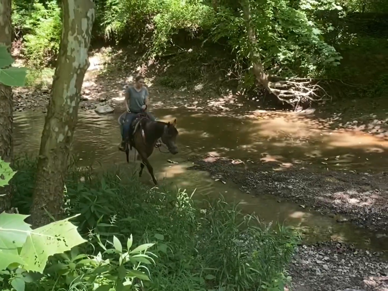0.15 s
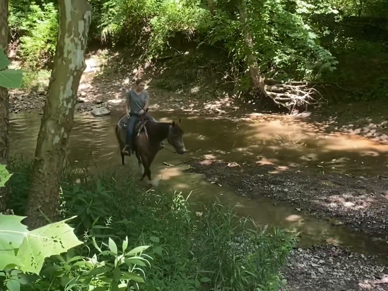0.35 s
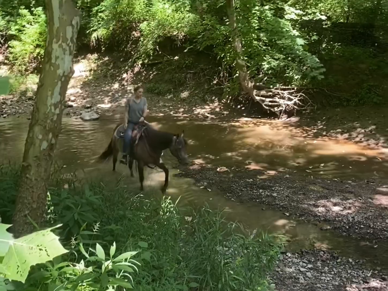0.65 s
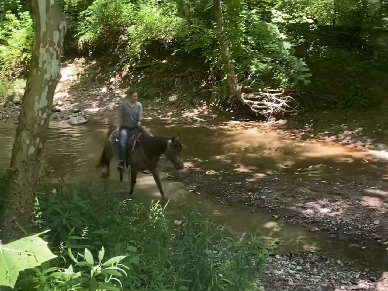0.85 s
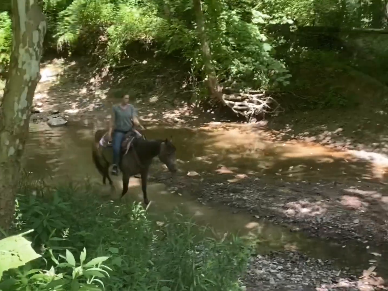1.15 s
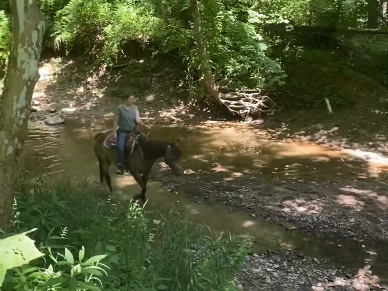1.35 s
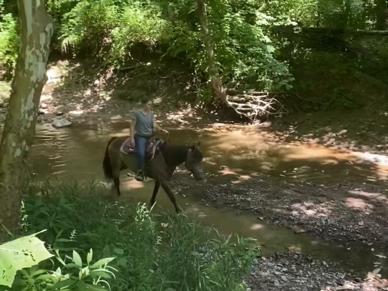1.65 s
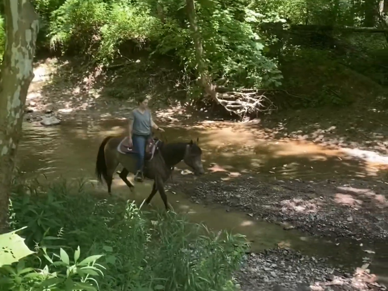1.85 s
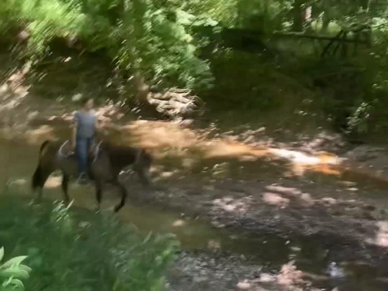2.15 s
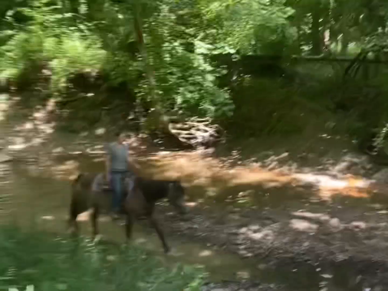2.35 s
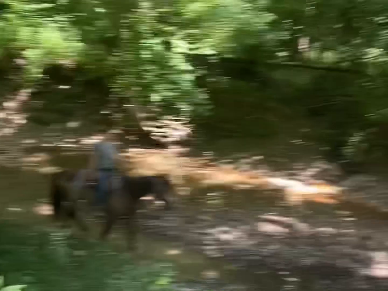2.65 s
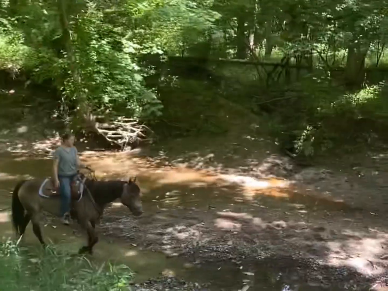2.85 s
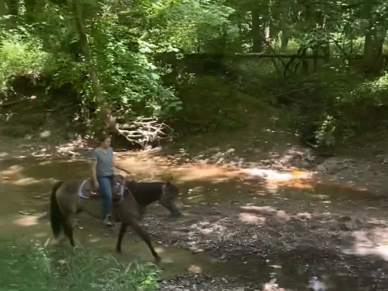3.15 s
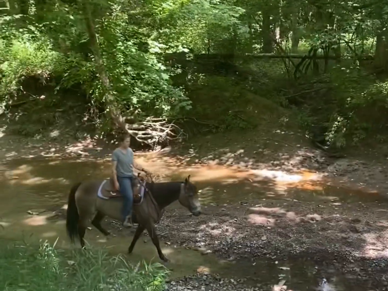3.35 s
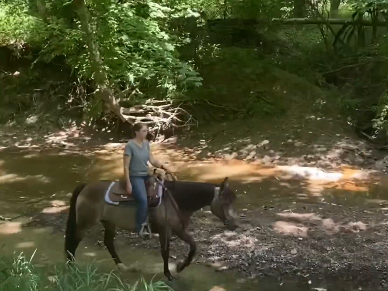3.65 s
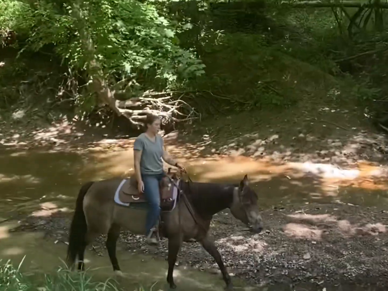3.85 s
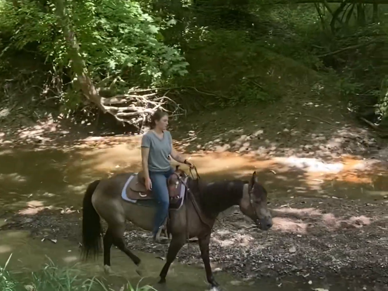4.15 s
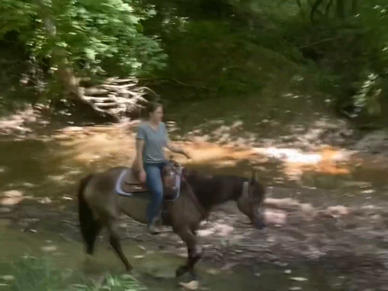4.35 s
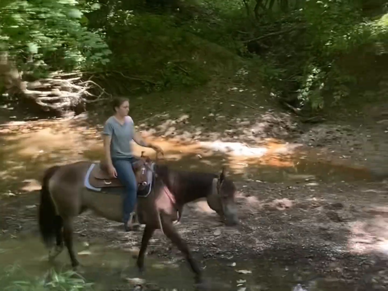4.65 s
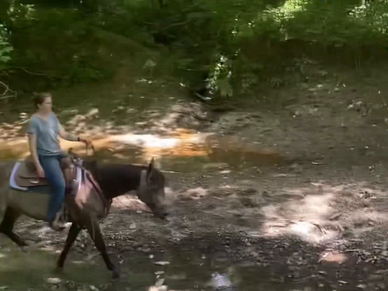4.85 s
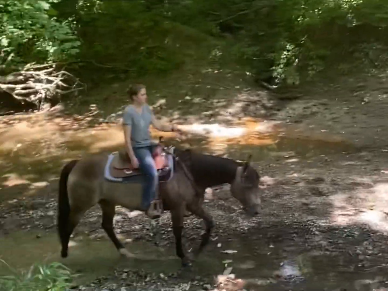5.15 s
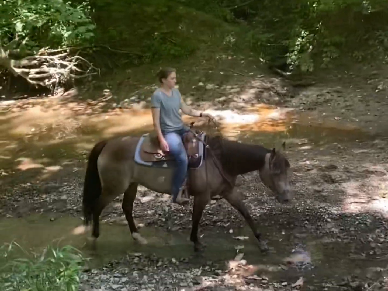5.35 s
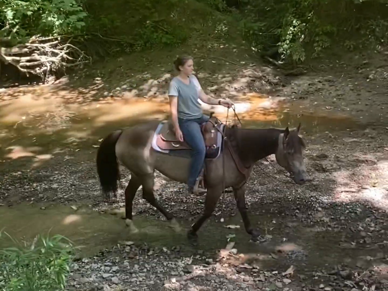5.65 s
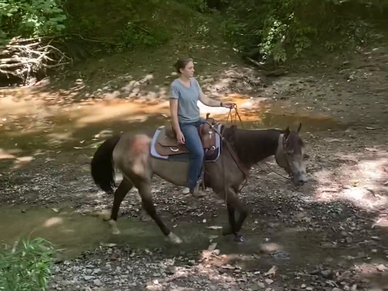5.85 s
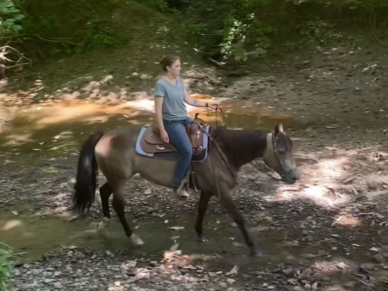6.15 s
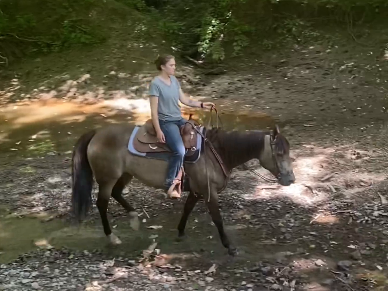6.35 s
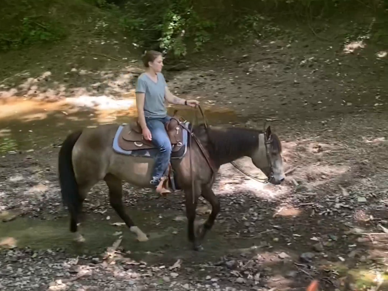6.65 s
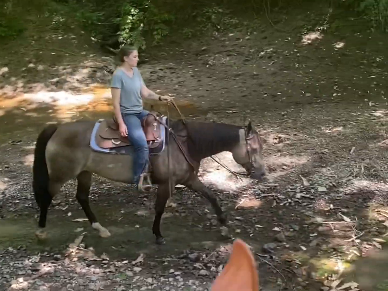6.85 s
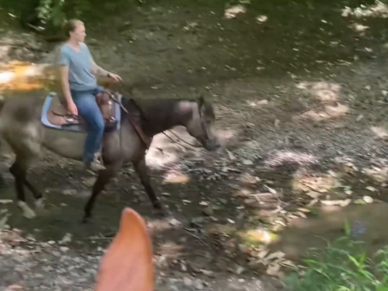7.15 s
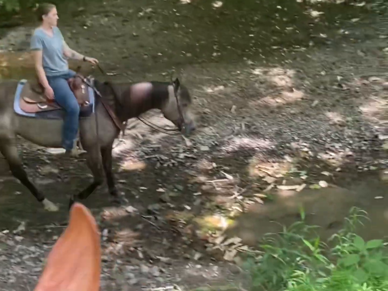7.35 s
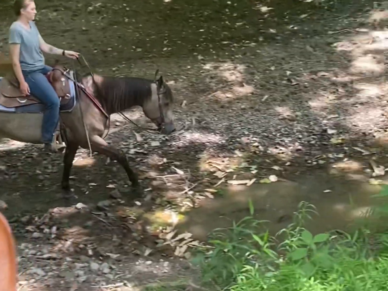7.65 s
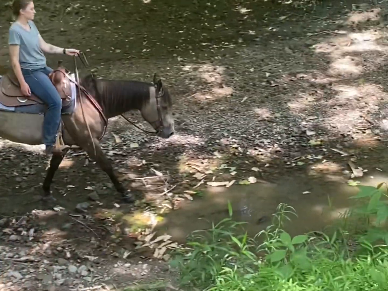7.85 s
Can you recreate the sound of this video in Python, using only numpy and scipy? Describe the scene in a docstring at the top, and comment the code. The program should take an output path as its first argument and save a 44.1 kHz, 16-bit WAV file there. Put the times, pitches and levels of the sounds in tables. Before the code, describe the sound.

A shallow creek trickles softly over a faint low rumble as a horse walks through it, heard in stereo slightly left. From 0 to 2 s, legs push slowly through the water with sloshes, bubbly churning, small plops and spray, plus muted pebble crunches and a few stone knocks. Between 2 and 3.5 s the wading is fuller, with hollow gulps, gliding gurgles and drops pattering back. Around 3.5 to 4 s the sound moves toward the middle and stones clack more often; the rumble swells gently near 4.6 s. At about 4.97 s a hard hoof fall gives a loud, high stone crack and a splashy slap. From 5.4 to 8 s, gritty gravel crunches and sharp knocks dominate, with a strong cluster near 5.8 s, while splashes and trickle thin out. The bank and trees answer faintly.

```python
"""A creek trickles softly over a low rumble, and at once a horse's legs start pushing through the water.
Plunging legs gulp, churn up bubbles and throw spray that rains back; hooves crunch gravel and knock stones. As
the horse moves from the shallow creek onto a wet gravel bar, the near bank and the trees answer faintly. Water
and gravel are showers of tiny damped rings over coloured noise; knocks are stone rings with a snap. Air pockets
and a few low thumps are tones whose pitch glides, and the echoes are noise that dies away."""
import sys
import numpy as np
from scipy import signal
from scipy.fft import rfft, irfft, next_fast_len
from scipy.io import wavfile
from scipy.ndimage import map_coordinates

SR = 44100
rng = np.random.default_rng(int(sys.argv[2]) if len(sys.argv) > 2 else 0)


def output_pcm(signal):
    """Save a mono or channel-first signal as 16-bit PCM at the path in sys.argv[1].

    Samples are clipped to [-1, 1] before scaling.
    """
    pcm = np.clip(np.atleast_2d(signal).T, -1, 1) * 32767
    wavfile.write(sys.argv[1], SR, np.round(pcm).astype(np.int16))


N = 352359

# Levels in the tables are those of the separate layers, before the final mix.
# Hooves pressing into the bed: start_s, length_s, pebbles_db, grit_db
HOOF_STEPS = [(0.109, 0.045, -53.5, -49.5), (0.233, 0.021, -45, -57), (0.391, 0.04, -50.5, -52),
              (0.808, 0.038, -49, -52), (1.208, 0.064, -52.5, -48.5), (1.625, 0.042, -50.5, -72),
              (1.958, 0.035, -40, -51.5), (2.339, 0.031, -48.5, -54.5), (2.388, 0.0058, -41, -52),
              (2.714, 0.023, -48.5, -49), (2.756, 0.023, -39.5, -50), (3.127, 0.06, -46, -50.5),
              (3.462, 0.044, -44, -50.5), (3.899, 0.032, -43.5, -47), (4.037, 0.034, -52.5, -59),
              (4.247, 0.0096, -46, -44.5), (4.269, .036, -39, -45), (4.425, .03, -51, -53),
              (4.651, .036, -40, -48), (5.409, .02, -45, -55), (5.569, 0.021, -41.5, -47.5),
              (5.764, 0.026, -42, -44.5), (5.822, 0.033, -47.5, -63), (5.862, 0.0077, -37.5, -46),
              (6.163, 0.023, -41, -41.5), (6.226, 0.0051, -39, -38.5), (6.604, 0.02, -52.5, -44.5),
              (6.975, 0.015, -42, -45.5), (7.366, 0.04, -49, -42.5), (7.7488, 0.01, -37, -55)]
# Stone knocking on stone: start_s, level_db, pitch_hz,
# crack_db and snap_db (relative to the ring, before a fixed boost of each)
STONE_KNOCKS = [(0.1228, -25.5, 1450, 7, -26), (0.2531, -30.5, 1530, -16, -22),
                (0.96, -31.5, 1285, 0.5, -27), (1.2633, -30, 1400, 1, -26), (1.824, -33, 2300, -3, -28),
                (1.939, -25.5, 2080, 2, -4), (2.391, -31, 1450, 1, -23), (2.714, -30, 1470, -26, -27),
                (3.1704, -25, 1520, -35, -35), (3.473, -26, 1610, -23, -2.5), (3.836, -33, 2160, -10, -18),
                (3.908, -30, 2630, -12, -3), (3.926, -33.5, 1110, -5, -22), (4.205, -36, 1450, -18, -16),
                (4.2689, -25.5, 1540, -2, -26), (4.308, -24, 2070, -22, 14), (4.6509, -26, 1150, -2.5, -21),
                (4.785, -29, 3870, -31, -12), (4.964, -9.5, 3760, -5, -15.5),
                (5.4115, -25.5, 1203, -37, -17.5), (5.5365, -33, 2860, -7, -13), (5.566, -32, 1035, -9, -8),
                (5.581, -31, 2830, -10, -16), (5.7795, -31, 1020, -6, -16), (5.767, -22, 1010, 4.5, -32),
                (5.802, -28.5, 1780, 1, -17), (5.851, -31, 1560, -2, -21), (5.8677, -18, 2810, -2, -26),
                (6.1678, -30, 1130, -2.5, -18), (6.2275, -24, 1490, -26, -16),
                (6.473, -37.5, 2950, -13, -11), (6.6119, -23, 1230, 5, 0), (6.988, -24, 1320, -8, -22),
                (7.3858, -24.5, 3100, -12, -20), (7.4029, -28, 1490, -17, -33), (7.7554, -22, 1390, 2, -21),
                (7.912, -39.5, 1580, 0, -3), (7.926, -35.5, 1640, 3, -10)]
# Ways one stone rings: pitch_multiple (varied at random for each knock), level_db
STONE_MODES = [(0.719, -18), (1.001, -3.5), (1.28, -9)]
# Air pockets closing behind a hoof or under a drip, and two low thumps near 2.4 s (the 72 Hz and 81 Hz rows):
# start_s, pitch_hz (at the peak), level_db, swell_s
PLOPS_AND_THUMPS = [(0.227, 460, -36, 0.0061), (.249, 660, -32.5, 0.0031), (.42, 513, -39.5, 0.0074),
                    (.85, 590, -44.5, 0.0063), (.917, 620, -49, 0.0088), (1.471, 605, -38.5, 0.0045),
                    (1.789, 664, -39.5, 0.0058), (1.972, 579, -37.5, 0.014), (2.146, 1260, -44.5, 0.0035),
                    (2.401, 72, -39, 0.0051), (2.429, 81, -35.5, 0.0056), (2.497, 1410, -42.5, .002),
                    (2.564, 702, -33.5, 0.009), (2.767, 784, -35, 0.0082), (2.805, 830, -35, 0.0053),
                    (2.854, 317, -35.5, 0.0066), (2.938, 305, -33, 0.0029), (3.168, 381, -38, 0.0048),
                    (3.496, 704, -38, 0.005), (3.508, 530, -29, 0.0036), (3.635, 597, -38.5, 0.0065),
                    (4.055, 785, -39.5, 0.0043), (4.297, 833, -34.5, 0.0046), (4.984, 640, -32.5, 0.0035),
                    (5.114, 1120, -38.5, .003), (5.742, 1290, -40, 0.0047), (6.173, 268, -40, 0.0062),
                    (6.194, 1890, -37, 0.0041), (6.633, 1720, -42.5, 0.0045), (6.745, 277, -43.5, 0.0082),
                    (7.574, 1510, -40.5, 0.0043)]
# Loudness of the low rumble: time_s, level_db
RUMBLE_LEVEL = [(0, -68), (3, -64.5), (4.6, -58), (5.9, -61.5), (6.6, -70), (8, -70.5)]

# Colours of the sounds, only relative within each table: frequency_hz, level_db (per Hz)
CHURN_COLOUR = [(60, -40), (150, 9), (420, -4.5), (750, 3.5), (1050, -2), (1600, -58), (4000, -82)]
DROP_COLOUR = [(500, -12), (950, -4.5), (1400, 0), (2600, -1.5), (3400, -10.5), (6000, -59)]
FIZZ_COLOUR = [(1500, -11.5), (2800, -2), (4000, -2), (5200, -4), (7200, -7), (10000, -10), (13000, -14),
               (16000, -43)]
PEBBLE_COLOUR = [(80, -36), (200, -1.5), (500, -6.5), (1100, 0.5), (2900, -4), (4500, -21), (9000, -50)]
RUMBLE_COLOUR = [(20, -39), (40, -5.5), (70, -1.5), (120, -3.5), (200, -7.5), (500, -41)]

# Stereo width of the textures: frequency_hz, side_to_mid_db
STEREO_WIDTH = [(60, -13), (180, -9), (550, -7), (2000, -13), (8000, -15)]
# Time the near bank's answer takes to fall by 60 dB: frequency_hz, decay_s
BANK_DECAY = [(200, 0.094), (1400, 0.052), (10000, 0.026)]
# Time the trees' answer takes to fall by 60 dB: frequency_hz, decay_s
TREE_DECAY = [(200, 1), (2000, 0.19), (10000, 0.069)]
# Phase by which the left channel leads for sound from ahead: frequency_hz, lead_radians
AHEAD_LEAD = [(0, 0), (5300, .4), (7100, 3.1), (8000, 3.3), (9800, 6.2), (11300, 6.5), (12800, 9.3)]
# Extra phase lead for sound from the left: frequency_hz, lead_radians
LEFT_LEAD = [(1800, 0), (2400, 1.4), (4500, 1.3), (5200, 0)]
# Left minus right level for sound from the left: frequency_hz, difference_db
LEFT_TILT = [(700, -1), (1300, 3), (2400, -2), (3700, 3), (4800, -1.5), (6000, 1)]
# Share of the sound that comes from the left: time_s, left_share (0 to 1)
LEFT_SHARE = [(3.5, 1), (3.9, 0.023)]
# Legs pushing through water: start_s, length_s, bubbles_db, bubble_pitch_hz (at the start), spray_db
LEG_PUSHES = [(0.072, 0.2, -57, 564, -52.5), (0.41, 0.039, -48.5, 560, -46),
              (0.545, 0.084, -56.5, 517, -52), (0.796, 0.11, -61.5, 676, -51),
              (1.225, 0.13, -53, 625, -44.5), (1.622, 0.075, -48.5, 596, -47),
              (1.752, 0.073, -50, 300, -54), (1.916, 0.091, -45, 590, -47), (2.32, 0.076, -53, 550, -51),
              (2.471, 0.096, -50.5, 335, -52), (2.748, 0.031, -34.5, 900, -43),
              (2.853, 0.08, -49, 500, -48.5), (3.135, 0.18, -51, 403, -54), (3.477, 0.041, -40, 556, -43.5),
              (3.585, 0.086, -47.5, 590, -49), (3.904, 0.19, -55.5, 640, -72),
              (4.246, 0.052, -43, 516, -43.5), (4.59, 0.06, -50, 448, -52), (4.948, 0.19, -52, 584, -51),
              (5.424, 0.28, -56, 640, -60), (5.76, 0.095, -59, 413, -70), (6.134, 0.22, -62.5, 400, -56.5),
              (6.57, 0.18, -73, 451, -59.5), (6.728, 0.04, -57, 314, -61.5), (7.347, 0.13, -63, 333, -54)]
# The running creek: time_s, drops_db (before a 3 dB cut), fizz_db
CREEK_TRICKLE = [(0, -53.5, -55.5), (2.4, -54.5, -57), (3.75, -53.5, -57.5), (5.18, -56.5, -60.5),
                 (6.25, -56, -60.5), (6.87, -62, -67), (7.99, -57, -65)]
# Stirred water between the steps: time_s, bubbles_db
LAPPING_LEVEL = [(0, -72), (2.3, -64), (4, -57.5), (5.4, -55.5), (6.6, -66), (8, -67.5)]
# Air pocket beside a leg growing or closing: start_s, length_s, start_pitch_hz, end_pitch_hz, level_db
LEG_GURGLES = [(1.245, 0.19, 616, 580.5, -49), (1.369, 0.086, 330, 150.4, -52),
               (1.82, .02, 1345, 2050, -45), (1.979, 0.17, 499.5, 150, -50.5),
               (2.139, 0.054, 230, 565, -52.5), (2.329, .06, 677, 567, -53), (2.5, .065, 173.4, 480, -48.5),
               (2.65, 0.042, 703, 735, -53), (2.778, 0.091, 401, 260, -46)]

TOP_HZ = 15800  # nothing passes above this
PUSH_S, SETTLE_S, DRAIN_S = 0.011, 0.049, 0.043  # rise of a push; decay of its bubbles; decay of its spray
SINK_OCT_PER_S = 1.6  # the bubbles get lower as the hoof goes deeper
LAPPING_HZ = 400  # pitch of the stirred water
FLIGHT_S, SCATTER_S = 0.27, 0.048  # thrown water lands this much later, spread over this time
# Landing drops, landing fizz and fizz of the throw, relative to the spray
FALL_DROPS_DB, FALL_FIZZ_DB, THROW_FIZZ_DB = -7, -9.5, -11
CAVITY_OCTAVES = .9  # width of the water pocket's resonance around a leg
STONE_CYCLES = 20  # wet gravel damps a stone within this many cycles
PLOP_RISE = .15  # share by which a plop ends above its pitch at the peak
SLAP_S, SLAP_BODY_DB, SLAP_FIZZ_DB, SLAP_DECAY_S = 4.9655, -35.5, -36.5, 0.052
# Random points a second for the pocket's flutter; share by which its pitch wavers
GURGLE_FLUTTER_HZ, GURGLE_WAVER = 140, .09
CLUMP_DB, CLUMP_HZ = 1.4, 45  # spray lands in small clumps: depth, and random points a second


def amp(db):
    """Turn decibels into a gain."""
    return 10 ** (np.asarray(db) / 20)


def unit(x):
    """Scale a sound to an average (rms) strength of 1."""
    return x / np.sqrt(np.mean(x ** 2) + 1e-20)


def along(points, hz):
    """Read a frequency table at any pitch, spacing pitches the way the ear does (log axis)."""
    table_hz, values = np.transpose(points)
    return np.interp(np.log(hz + 1), np.log(table_hz + 1), values)


def curves(rows):
    """Turn each column after the time into a curve with one value per sample."""
    times, *columns = np.transpose(rows)
    return [np.interp(np.arange(N) / SR, times, column) for column in columns]


def filtered(x, response):
    """Reshape a sound's frequencies with a given response."""
    n = x.shape[-1]
    padded = next_fast_len(n + 8192)
    spectrum = rfft(x, padded) * response(np.fft.rfftfreq(padded, 1 / SR))
    return irfft(spectrum, padded)[..., :n]


def add(track, start_s, sound):
    """Mix a sound into a track at a given time."""
    part = track[max(round(start_s * SR), 0):][:len(sound)]
    part += sound[:len(part)]


def wobble(rate):
    """A random curve: straight lines between random points, this many points a second."""
    points = rng.standard_normal(int(N * rate / SR) + 4)
    return map_coordinates(points, [np.arange(N) * rate / SR], order=1)


def ring(t, hz, cycles):
    """A vibration swells within a cycle or so, then falls by 60 dB in the given number of cycles."""
    shape = amp(-60 * t * hz / cycles) * (1 - np.exp(-t * hz)) ** 2
    return shape / shape.max() * np.sin(2 * np.pi * (hz * t + rng.random()))


def grains(lo_hz, hi_hz, cycles, rise, scatter_db, count, size):
    """A shower of tiny damped rings at random times, pitches, sizes and places, as mid and side signals."""
    start, place = rng.integers(0, N, count), rng.standard_normal(count)
    hz = lo_hz * (hi_hz / lo_hz) ** rng.random((count, 1))
    weight = amp(scatter_db * np.minimum(rng.exponential(size=(count, 1)), 4)) * hz
    turns = hz * np.arange(size) / SR
    age = np.minimum(turns / cycles, 1)
    shape = amp(-60 * age) * (1 - age) * (1 - np.exp(-2 * turns))
    rings = weight * shape * np.sin(2 * np.pi * turns * (1 + rise * age))
    index = (start[:, None] + np.arange(size)).ravel()
    mid_and_side = [np.bincount(index, (rings * gain).ravel(), N)[:N] for gain in (1, place[:, None])]
    return unit(np.array(mid_and_side))


def texture(shower, tone, blur_db):
    """Near grains over a noise blur of countless small ones, coloured and spread in stereo; rms 1."""
    # The blur gets half the colour here; the whole mix gets the full colour below.
    blur = unit(filtered(rng.standard_normal((2, N)), lambda hz: amp(along(tone, hz) / 2)))

    def colour_and_width(hz):
        return amp(along(tone, hz)) * np.array([np.ones_like(hz), amp(along(STEREO_WIDTH, hz))])

    mid, side = filtered(shower + amp(blur_db) * blur, colour_and_width)
    return unit(np.array([mid + side, mid - side]))


def swept(x, centre_hz, octaves):
    """Pass a sound through a broad resonance that follows a pitch curve; rms 1."""
    hz, t, z = signal.stft(x, SR, nperseg=1024)
    centre = np.interp(t, np.arange(N) / SR, centre_hz)
    gain = 1 / (1 + (np.log2((hz[:, None] + 1) / centre) / octaves) ** 2)
    # Moving the resonance should not change the loudness.
    gain /= np.sqrt(np.mean(abs(z) ** 2, axis=(0, 2)) @ gain ** 2)
    return unit(signal.istft(z * gain, SR, nperseg=1024)[1][:, :N])


def echo(x, decay_table, delay, size):
    """A diffuse stereo answer made of noise, in which each frequency dies at its own speed."""
    hz, t, z = signal.stft(rng.standard_normal((2, size)), SR, nperseg=256)
    decay = amp(-60 * t / along(decay_table, hz)[:, None])
    tail = signal.istft(z * decay, SR, nperseg=256)[1]
    tail = np.pad(tail / np.linalg.norm(tail[0]), ((0, 0), (round(abs(delay) * SR), 0)))
    return signal.fftconvolve(x, tail, axes=1)[:, :N]


def ports(x):
    """Two microphone ports hear the treble out of step, and unequally loud when it comes from the left."""
    def lead(points, hz):
        return np.exp(np.array([[.5j], [-.5j]]) * along(points, hz))

    def from_left(hz):
        return lead(LEFT_LEAD, hz) * amp(np.array([[.5], [-.5]]) * along(LEFT_TILT, hz))

    left_share = curves(LEFT_SHARE)[0].clip(0, 1)
    placed = (1 - left_share) * x + left_share * filtered(x, from_left)
    return filtered(placed, lambda hz: lead(AHEAD_LEAD, hz))


def rumble():
    """Moving air and handling make a soft low rumble, built from low noise."""
    return amp(curves(RUMBLE_LEVEL)[0]) * texture(np.zeros((2, N)), RUMBLE_COLOUR, blur_db=0)


def stroke(age, length, release):
    """A push through water builds up, holds and lets go; age counts from its start."""
    attack = 1 - np.exp(-np.maximum(age, 0) / PUSH_S)
    return attack * np.exp(-np.maximum(age - length, 0) / release)


def wading():
    """Each push churns, throws water and lets it fall back: bubble, drop and fizz levels, and bubble pitch."""
    t = np.arange(0, N, 64) / SR  # slow curves need only every 64th sample
    start, length, churn_db, hz, spray_db = np.transpose(LEG_PUSHES)[:, :, None]
    age = t - start
    # Squared levels (powers) add up where pushes overlap.
    churn = (amp(churn_db) * stroke(age, length, SETTLE_S)) ** 2
    throw = ((amp(spray_db) * stroke(age, length, DRAIN_S)) ** 2).sum(0)
    landing = np.exp(-.5 * ((age - FLIGHT_S) / SCATTER_S) ** 2)
    fall = (amp(spray_db) ** 2 * landing).sum(0)
    lapping = amp(np.interp(t, *np.transpose(LAPPING_LEVEL))) ** 2
    bubbles = churn.sum(0) + lapping
    # The louder a push is at this moment, the more it decides the pitch.
    sinking_hz = hz * 2 ** (-SINK_OCT_PER_S * age.clip(0, 1))
    pitch = ((churn * sinking_hz).sum(0) + lapping * LAPPING_HZ) / bubbles
    drops = throw + amp(FALL_DROPS_DB) ** 2 * fall
    fizz = amp(THROW_FIZZ_DB) ** 2 * throw + amp(FALL_FIZZ_DB) ** 2 * fall
    return curves(np.transpose([t, np.sqrt(bubbles), np.sqrt(drops), np.sqrt(fizz), pitch]))


def water():
    """The creek trickles; legs churn up big bubbles and thrown water rains back in drops and fine fizz."""
    churn, splash, hiss, bubble_hz = wading()
    creek_drops_db, creek_fizz_db = curves(CREEK_TRICKLE)
    drops_level = np.hypot(splash, amp(creek_drops_db))
    fizz_level = np.hypot(hiss, amp(creek_fizz_db))
    # A bubble's pitch climbs as it rises; a deep plunge traps bigger, lower ones.
    bubbles = grains(150, 1000, cycles=24, rise=.16, scatter_db=1.3, count=1800, size=2800)
    bubbles = swept(texture(bubbles, CHURN_COLOUR, blur_db=-8), bubble_hz, octaves=CAVITY_OCTAVES)
    drops = grains(1200, 3900, cycles=46, rise=.08, scatter_db=2, count=3600, size=700)
    drops = texture(drops, DROP_COLOUR, blur_db=-3)
    fizz = grains(2800, 13000, cycles=16, rise=.05, scatter_db=2.8, count=9000, size=160)
    fizz = texture(fizz, FIZZ_COLOUR, blur_db=4.5)
    spray = drops_level * amp(-3) * drops + fizz_level * fizz
    clumps = amp(CLUMP_DB * wobble(CLUMP_HZ))
    return churn * bubbles + clumps * spray


def plops_and_thumps():
    """Each pocket of air swells into a short ring whose pitch climbs as it nears the surface; the two lowest
    rows ring as dull low thumps."""
    out, t = np.zeros(N), np.arange(SR // 6) / SR
    for start, hz, db, swell in PLOPS_AND_THUMPS:
        age = t / swell  # 1 at the loudest moment
        glide = 1 + PLOP_RISE * np.tanh((age - 1) / 2)
        shape = (age * np.exp(1 - age)) ** 2
        add(out, start, amp(db) * shape * np.sin(2 * np.pi * hz * np.cumsum(glide) / SR))
    return out


def gurgles():
    """A pocket's radius changes steadily and its fluttering pitch goes inversely: down in a plunge, up in a lift."""
    out = np.zeros(N)
    for start, length, start_hz, end_hz, db in LEG_GURGLES:
        progress = np.arange(round(length * SR)) / (length * SR)
        size = len(progress)
        radius = (1 - progress) / start_hz + progress / end_hz  # in effect 1 / pitch
        pitch = (1 + GURGLE_WAVER * wobble(GURGLE_FLUTTER_HZ / 2)[:size]) / radius
        # Two random curves make both the strength and the phase flutter.
        flutter = (wobble(GURGLE_FLUTTER_HZ) + 1j * wobble(GURGLE_FLUTTER_HZ))[:size]
        tone = np.real(flutter * np.exp(2j * np.pi * np.cumsum(pitch) / SR))
        add(out, start, amp(db) * unit(tone * np.sqrt(np.sin(np.pi * progress))))
    return out


def slap():
    """The hardest hoof fall slaps up a sheet of spray, too fine for single drops, that dies smoothly."""
    age = np.arange(N) / SR - SLAP_S
    no_grains = np.zeros((2, N))
    body = amp(SLAP_BODY_DB) * texture(no_grains, PEBBLE_COLOUR, blur_db=0)
    fizz = amp(SLAP_FIZZ_DB) * texture(no_grains, FIZZ_COLOUR, blur_db=0)
    return (age > 0) * np.exp(-abs(age) / SLAP_DECAY_S) * (body + fizz)


def gravel():
    """Pebbles and grit grind while the hoof takes the weight; then the wet bed settles softly."""
    pebble_level, grit_level, t = np.zeros(N), np.zeros(N), np.arange(SR // 2) / SR
    for start, length, pebbles_db, grit_db in HOOF_STEPS:
        grind = np.exp(-np.maximum(t / length - 1, 0) / 0.36)
        settling = amp(-10.0) * np.exp(-t / (3.73 * length))
        push = (1 - np.exp(-t / 0.00012)) * np.maximum(grind, settling)
        add(pebble_level, start, amp(pebbles_db) * push)
        add(grit_level, start, amp(grit_db) * push)
    pebbles = grains(312, 4450, cycles=21.3, rise=0, scatter_db=2.3, count=3400, size=650)
    grit = grains(3330, 9200, cycles=17.0, rise=0, scatter_db=3.5, count=12000, size=130)
    pebbles = pebble_level * texture(pebbles, PEBBLE_COLOUR, blur_db=-8)
    return pebbles + grit_level * texture(grit, FIZZ_COLOUR, blur_db=-2)


def knocks():
    """Stones in wet gravel snap on contact, crack and ring a few cycles, scattered by the near bank."""
    out, t = np.zeros((2, N)), np.arange(SR // 12) / SR
    for start, db, hz, crack_db, snap_db in STONE_KNOCKS:
        body = np.zeros(len(t))
        for multiple, level_db in STONE_MODES:
            mode_hz = hz * multiple ** rng.normal(1, 0.36)  # no two stones have the same shape
            body += amp(level_db) * ring(t, mode_hz, cycles=STONE_CYCLES)
        crack = ring(t, hz=2590, cycles=3.8)
        snap = filtered(rng.standard_normal(len(t)), lambda f: amp(along(FIZZ_COLOUR, f) / 2))
        snap *= np.exp(-t / .0011)
        hit = body / abs(body).max()
        hit += amp(crack_db + 3.5) * crack + amp(snap_db + 9.0) * snap / abs(snap).max()
        hit *= amp(db) / abs(hit).max()
        answers = echo(hit[None], BANK_DECAY, delay=0.001823, size=4000)
        for channel, answer in zip(out, answers):
            add(channel, start, hit + amp(-5.0) * answer[:len(t)])
    return out


def scene():
    """The horse moves from the left towards the middle; the trees answer faintly."""
    horse_and_creek = knocks() + plops_and_thumps() + gurgles() + slap() + gravel() + water()
    horse_and_creek *= amp([[.25], [-.25]])  # slightly louder on the left
    woods = amp(-19) * echo(horse_and_creek, TREE_DECAY, delay=.018, size=30000)
    return ports(horse_and_creek + woods) + rumble()


def record(dry):
    """Keep nothing above the band limit."""
    return filtered(dry, lambda hz: hz < TOP_HZ)


dry = scene()
out = record(dry)
output_pcm(out)
```